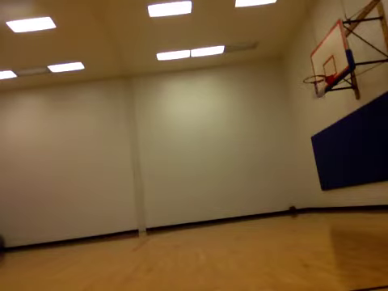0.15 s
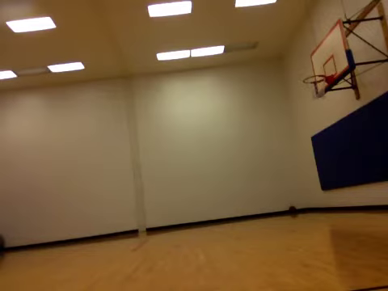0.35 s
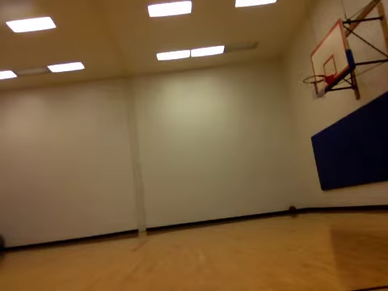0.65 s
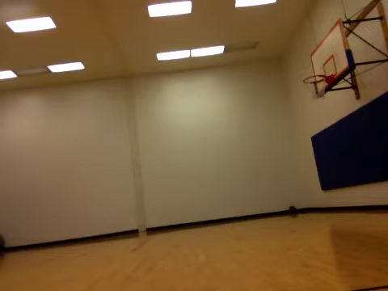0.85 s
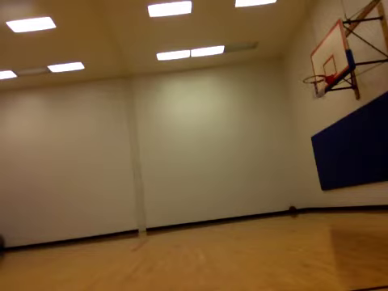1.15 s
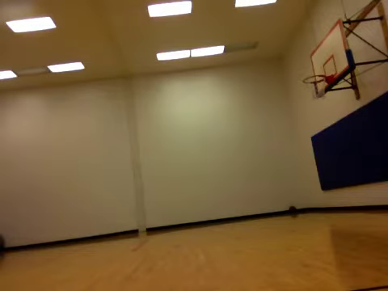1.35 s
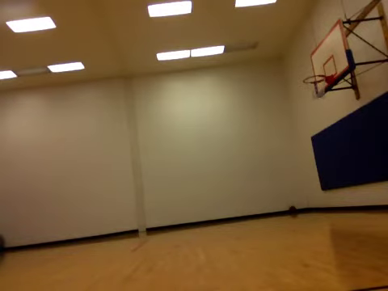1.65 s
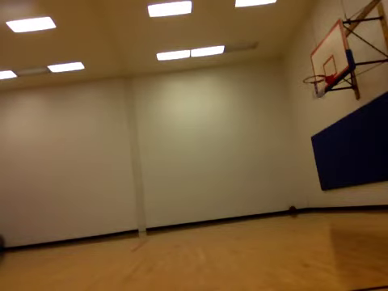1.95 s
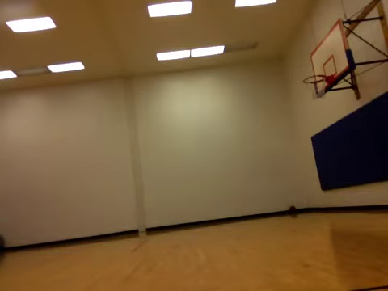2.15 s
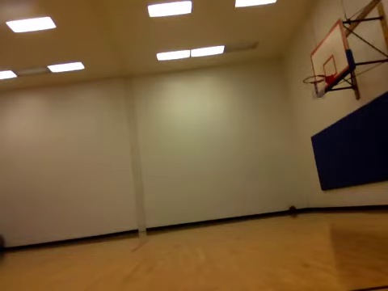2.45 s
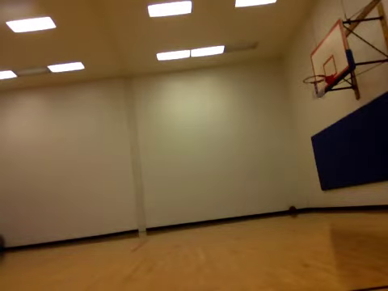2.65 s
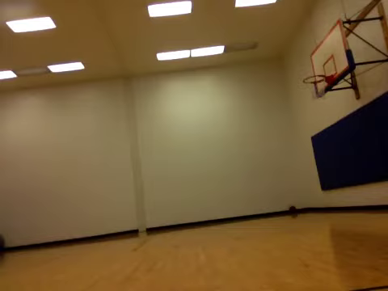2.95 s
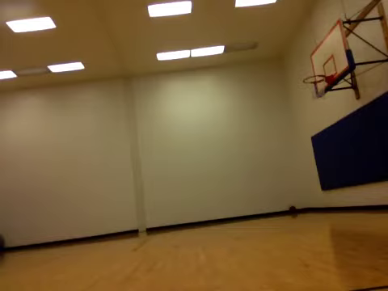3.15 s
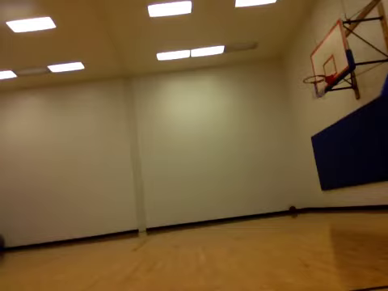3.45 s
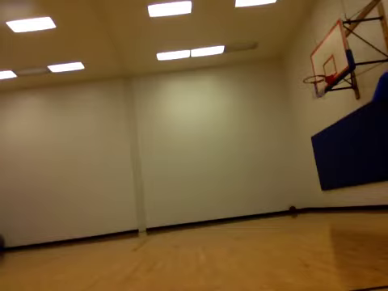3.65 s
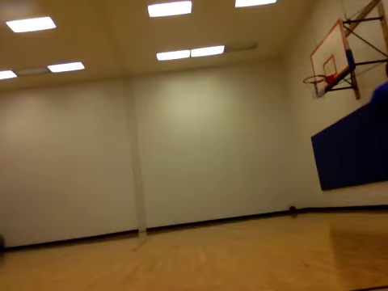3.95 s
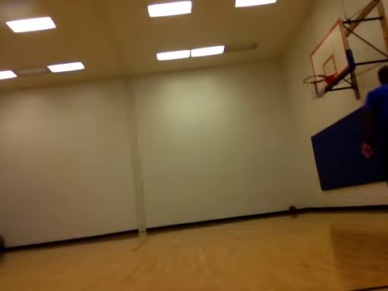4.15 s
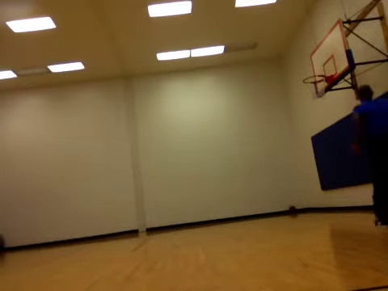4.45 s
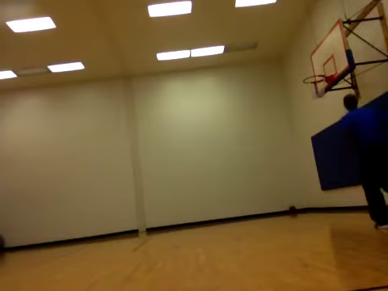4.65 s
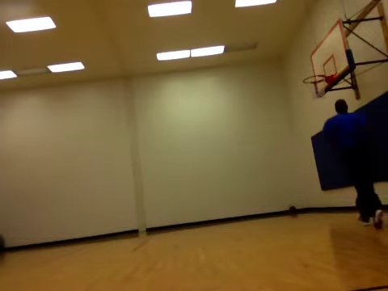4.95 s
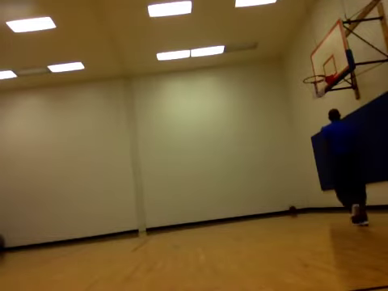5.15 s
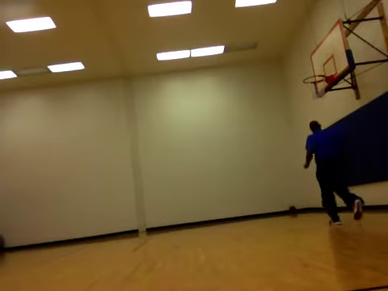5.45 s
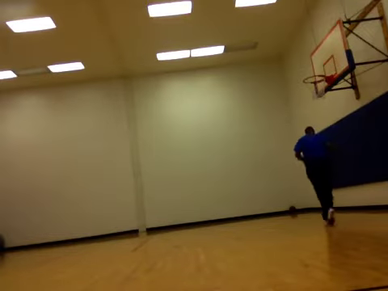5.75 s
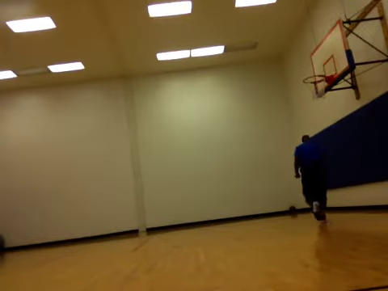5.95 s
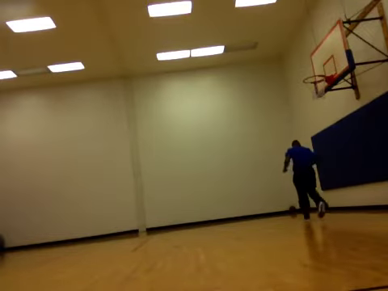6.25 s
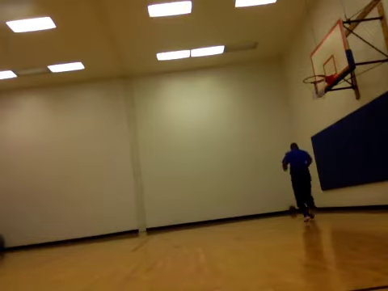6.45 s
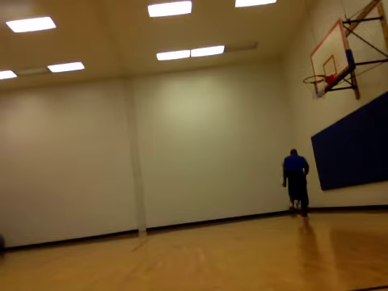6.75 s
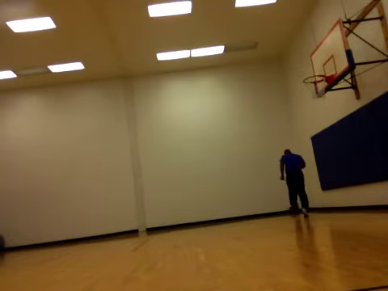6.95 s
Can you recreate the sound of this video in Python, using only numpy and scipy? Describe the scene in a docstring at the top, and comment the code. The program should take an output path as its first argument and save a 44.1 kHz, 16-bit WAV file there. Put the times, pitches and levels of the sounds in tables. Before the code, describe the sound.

Quiet knocks on wood near the microphone open over steady fan noise. A basketball slams on hardwood, hard and sharp, with wall slaps and a long bright hall tail. The bounces continue, spaced wide at first, then quickening and dulling into a low patter that dies out. Afterwards, soft reverberant jogging steps with brief rubbery scuffs and cloth rustle recede under the lingering echo of the bare gymnasium.

```python
"""A basketball bangs on the sprung wooden floor of a large empty gym, then is left to bounce itself out.
Each bounce is an impulse that excites damped modes of boards and ball, and dispersive waves in the floor.
Discrete echoes and a diffuse noise tail, shaped band by band, make the hall ring for seconds.
Woody knocks sound close by; a player jogs away with scuffing shoes and rustling clothes (filtered noise).
Beneath lies the steady rumble and hiss of the ventilation, with a faint fan tone."""
import sys
import numpy as np
from scipy import signal
from scipy.fft import rfft, irfft
from scipy.io import wavfile
from scipy.ndimage import uniform_filter1d

SR = 44100
rng = np.random.default_rng(int(sys.argv[2]) if len(sys.argv) > 2 else 0)


def persist_wave(psi):
    """Save psi, clipped to +-1, as 16-bit WAV."""
    counts = np.round(np.clip(psi, -1, 1) * 32767).astype(np.int16)
    wavfile.write(sys.argv[1], SR, np.atleast_2d(counts).T)


N = 312801

# bounces of the ball: (t/s, boom level/dB, boom f/Hz, slap level/dB, slap tilt/dB per octave,
# bite level/dB, bite f/Hz)
BOUNCES = [(1.5602, -8, 146.6, -4, 0.4, 1.5, 1800), (2.2524, -9, 161.5, 1, 2.5, -1.5, 1800),
           (3.5816, -13.5, 153.3, -6, 1.4, 4, 3200), (4.2370, -13, 165, -12, 0.9, 0, 3200),
           (4.7424, -9.5, 147.7, -11, 1.5, 1, 1800), (5.1254, -17, 144.3, -18, -1, 4, 3200),
           (5.4145, -17.5, 171.5, -38.5, -6.5, 8, 1800), (5.639, -17, 164.5, -33.5, -5, 9, 1800)]
# spectrum of the slap: (f/Hz, level/dB)
SLAP_SPECTRUM = [(40, -23), (150, -12.5), (400, 6), (650, 2.5), (1100, 1), (1750, 2), (2700, -1.5),
                 (4000, -4), (5700, -6), (7800, -12.5), (10000, -17), (12000, -27.5), (15500, -52.5)]


def ball(shape, hall_db=0):
    """Impact excitation: each bounce rings the ball and the boards and sends waves through the floor."""
    out = np.zeros(N)
    for s, boom_db, boom_hz, slap_db, tilt_db, bite_db, bite_hz in BOUNCES + settling():
        thud = boom(boom_db, boom_hz)
        crack = slap(slap_db, SLAP_SPECTRUM, tilt_db, 0.93, bite_db, bite_hz)
        add(out, s, in_gym(thud, crack, shape, hall_db))
        add(out, s, amp(boom_db) * bending_waves(slap_db, size=8192))
    return out


# each last flight is this share of the one before, and each last bounce this much softer
RESTITUTION, SETTLE_DB = 0.765, -8.5


def settling(count=4):
    """Inelastic rebound: the last small bounces come ever quicker and softer, in geometric progression."""
    s, boom_db, boom_hz, slap_db, *colour = BOUNCES[-1]
    flight = s - BOUNCES[-2][0]
    rows = []
    for k in range(1, count + 1):
        s += flight * RESTITUTION ** k
        softer_db = k * SETTLE_DB
        rows.append((s, boom_db + softer_db, boom_hz, slap_db + softer_db, *colour))
    return rows


# modes of the floor boards: (multiple of the boom f, level/dB, t60/s)
BOARD_MODES = [(.7, -31, 0.039), (1, 3.5, 0.047), (1.3, -0.5, 0.039), (1.88, -12.5, 0.07),
               (2.8, -20.5, 0.062), (3.7, -23, 0.11)]


def boom(db, hz, push_s=0.003):
    """Damped modal vibration: the boards are pushed down and swing back."""
    t = np.arange(SR // 4) / SR
    onset = 1 - np.exp(-t / push_s)
    return -amp(db) * ring(BOARD_MODES, t, hz) * onset


# modes of the air inside the ball: (f/Hz, level/dB, t60/s)
BALL_MODES = [(928, -44.5, 0.11), (1496, -42, 0.2), (1815, -28.5, 0.01), (1930, -44, 0.19),
              (2115, -41, 0.071), (2580, -56, 0.043)]


def slap(db, points, tilt_db, cavity, bite_db=0, bite_hz=1800):
    """Cavity resonance: the contact is one spike, with more or less bite; the air in a ball pings after it."""
    out = cavity * ring(BALL_MODES, np.arange(SR // 4) / SR)
    add(out, 0, click(points, tilt_db))
    bite = signal.lfilter(*signal.iirpeak(bite_hz, 1, fs=SR), out)
    return amp(db) * (out + (amp(bite_db) - 1) * bite)


# paths of bending waves through the floor: (travel t/s at BEND_HZ, level/dB)
BEND_PATHS = [(0.0124, 0.31), (0.023, -1)]
# spectrum of the bending waves: (f/Hz, level/dB)
BEND_SPECTRUM = [(80, -30), (150, 0), (300, 4), (550, -1.5), (1000, -3.5), (1800, -21), (4000, -64)]
BEND_HZ = 705
BEND_TILT_DB, BEND_SOFTEN = 0.5, 0.061  # tilt (dB per octave), and its change per dB of slap


def bending_waves(slap_db, size, level_db=17, spread=0.133):
    """Dispersion: boards carry high notes faster, so each path is a falling sweep, duller if the slap is soft."""
    hz = np.fft.rfftfreq(size, 1 / SR)
    paths = 0
    for s, db in BEND_PATHS:
        travel_s = s * (1 + spread * rng.uniform(-0.956, 1))
        # this phase gives a delay proportional to 1 / sqrt(frequency)
        paths = paths + amp(db) * np.exp(-4j * np.pi * travel_s * np.sqrt(BEND_HZ * hz))
    tilt_db = (BEND_TILT_DB + BEND_SOFTEN * slap_db) * np.log2(np.maximum(hz / 300, 1))
    return amp(level_db) * irfft(paths * amp(read(BEND_SPECTRUM, hz) + tilt_db), size)


def floor_waves(thud, level_db=-25, last_s=0.032):
    """Multipath propagation: waves in the sprung floor keep the boom up for a few hundredths of a second."""
    size = int(last_s * SR)
    path = amp(level_db) * rng.standard_normal(size) * np.linspace(0, 1, size)
    return thud + signal.fftconvolve(thud, path)[:len(thud)]


# knocks close by: (t/s, boom level/dB, tap level/dB)
KNOCKS = [(0.094, -29, -35.5), (0.1204, -30, -27), (.203, -37, -40), (0.2189, -37, -37), (.372, -37.5, -46),
          (1.025, -39.5, -45), (1.29, -39, -70), (3.4214, -45, -37)]
# woody note of a knock: (f/Hz, level/dB, t60/s)
WOOD_MODES = [(980, -11, 0.021), (1134, -10.5, 0.028), (1290, -12.5, 0.023)]
KNOCK_HZ, KNOCK_TILT_DB, KNOCK_HALL_DB = 185, -2, -4.5  # boom pitch, tilt per octave, hall level


def knocks(shape):
    """Near-field impacts: a blunt tap and a woody modal note, fairly dry."""
    out = np.zeros(N)
    note = ring(WOOD_MODES, np.arange(SR // 4) / SR)
    for s, boom_db, tap_db in KNOCKS:
        clack = tap(tap_db, KNOCK_TILT_DB, spread_s=0.0058) + amp(tap_db) * note
        add(out, s, in_gym(boom(boom_db, KNOCK_HZ), clack, shape, KNOCK_HALL_DB, echo_db=1))
    return out


# spectrum of a blunt tap: (f/Hz, level/dB)
TAP_SPECTRUM = [(60, -48), (200, -20), (400, -1.5), (560, -2.5), (800, -1), (1150, 3), (1650, 0),
                (2100, -3), (3000, -3), (4200, -7), (6000, -11.5), (10000, -36), (15500, -28)]


def tap(db, tilt_db, spread_s):
    """Distributed contact: a blunt touch with no ping, spread over a few thousandths of a second."""
    return scattered(slap(db, TAP_SPECTRUM, tilt_db, 0), share=0.93, life_s=spread_s)


# footfalls of the player: (t/s, boom level/dB, scuff level/dB)
FOOTFALLS = [(3.365, -45.5, -75), (5.532, -30, -45), (5.979, -34, -51), (6.364, -37.5, -44),
             (6.806, -44, -47.5)]
STEP_HZ, STEP_TILT_DB, STEP_HALL_DB = 149, -8, 1.5  # boom pitch, tilt per octave, hall level
HEEL_DB = -5  # the heel's tap, relative to the boom


def footfalls(shape):
    """Reverberant impacts: the heel taps and the boards boom, mostly by way of the hall."""
    out = np.zeros(N)
    for s, boom_db, _ in FOOTFALLS:
        heel = tap(boom_db + HEEL_DB, STEP_TILT_DB, spread_s=0.014)
        add(out, s, in_gym(boom(boom_db, STEP_HZ), heel, shape, STEP_HALL_DB))
    return out


# spectrum of the sliding soles: (f/Hz, level/dB)
SCUFF_SPECTRUM = [(200, -38), (600, 0.5), (1500, 4.5), (2400, -1.5), (3500, -2), (6000, -5), (14000, -27)]
# the sole slides as it lands: lead before the footfall, length, tilt per octave
SCUFF_LEAD_S, SCUFF_S, SCUFF_TILT_DB = 0.012, 0.11, -0.5


def scuffs(slip_db=2.0):
    """Stick-slip friction: rubber sticks and slips many times in one slide on the varnish."""
    out = np.zeros(N)
    size = int(SCUFF_S * SR)
    for s, _, db in FOOTFALLS:
        slips = amp(slip_db * evened(uniform_filter1d(rng.standard_normal(size), size=150)))
        slide = evened(noise(SCUFF_SPECTRUM, size, SCUFF_TILT_DB) * slips)
        add(out, s - SCUFF_LEAD_S, amp(db) * slide * np.sqrt(np.hanning(size)))
    return out


# rustles of the moving player's clothes: (t/s, length/s, level/dB)
RUSTLES = [(0.836, 0.67, -49.5), (3.9, 3.9, -52.5), (6.3, 1.3, -55)]
# spectrum of the cloth: (f/Hz, level/dB)
CLOTH_SPECTRUM = [(150, -20), (300, 0.5), (550, 8), (1000, -1), (2200, -6.5), (4500, -12), (8000, -20),
                  (15000, -34)]
RUSTLE_RISE_S, RUSTLE_FADE_DB = 0.093, -10.5  # rise and release time; fade over one rustle


def rustles():
    """Friction noise: cloth rubs as the player moves, each rustle fading along its length."""
    out = np.zeros(N)
    for s, length, db in RUSTLES:
        t = np.arange(int(length * SR)) / SR
        edges = np.minimum(np.minimum(t, length - t) / RUSTLE_RISE_S, 1)
        swell = edges * amp(db + RUSTLE_FADE_DB * t / length)
        add(out, s, swell * noise(CLOTH_SPECTRUM, N)[:len(t)])
    return out


def player(shape, flutter_db=2, direct_db=-4, hall_db=-1):
    """Amplitude modulation: soles and clothes rub in uneven little spurts, heard mostly by way of the hall."""
    flutter = evened(uniform_filter1d(rng.standard_normal(N), size=600))
    rub = (rustles() + scuffs()) * amp(flutter_db * flutter - 2.5)
    return amp(direct_db) * rub + amp(hall_db) * signal.fftconvolve(rub, hall_tail(shape))[:N]


# reflections off the walls and ceiling: (delay t/s, level/dB)
ECHOES = [(0.024, -12), (0.03, -15.5), (0.0545, -12.5), (0.059, -23), (0.0694, -16), (0.0722, -33)]


def in_gym(thud, crack, shape, hall_db, wall_s=0.013, echo_db=0, wall_db=-10, bass_echo_db=0,
           crack_hall_db=4):
    """Superposition of sound paths: direct sound, nearest wall, single echoes and diffuse tail."""
    out = amp(hall_db) * signal.fftconvolve(thud + amp(crack_hall_db) * crack, hall_tail(shape))
    direct = scattered(scattered(crack, share=0.75, life_s=0.00087), share=0.35, life_s=0.02)
    add(out, 0, floor_waves(thud) + direct)
    # thud and crack are mirrored at their own levels, the crack scattered
    mirrored = amp(bass_echo_db) * thud + amp(echo_db) * scattered(crack, share=0.3, life_s=0.00063)
    for delay, db in [(wall_s, wall_db)] + ECHOES:
        add(out, delay, amp(db) * mirrored)
    return out


def scattered(sound, share, life_s):
    """Scattering: a spike is followed by a short spray of reflections off things nearby."""
    t = np.arange(SR // 16) / SR
    spray = rng.standard_normal(len(t)) * np.exp(-t / life_s) * (t > 0.0003)
    return sound + share * signal.fftconvolve(sound, spray / np.linalg.norm(spray))[:len(sound)]


# decay of the hall: (f/Hz, t60/s)
HALL_T60 = [(80, 1.7), (160, 1.69), (300, 1.09), (600, 4.5), (1600, 4), (3000, 3.5), (5000, 2),
            (8000, 1.11), (11000, 0.58), (15000, .5)]
# spectrum of the hall's tail: (f/Hz, level/dB)
HALL_GAIN = [(70, -11), (150, 2.5), (250, 10), (500, -1), (1000, -3), (2000, 0), (3500, -0.5), (6000, -2),
             (10000, 3.5), (13000, 13), (15500, 15)]


def hall_shape(swell_s=0.071, swell_width_s=0.0087, early=0.24):
    """Reverberant decay by band and time: thin at first, dense once the far walls answer."""
    hz = np.fft.rfftfreq(512, 1 / SR)[:, None]
    t = np.arange(900) * 128 / SR
    swell = early + (1 - early) / (1 + np.exp((swell_s - t) / swell_width_s))
    onset = 1 - np.exp(-t / 0.018)
    return swell * onset * amp(read(HALL_GAIN, hz) - 60 * t / read(HALL_T60, hz))


def hall_tail(shape, grain_db=2.0, grain_s=0.46):
    """Diffuse field: a fresh random tail, grainy while its reflections are still few."""
    real, imaginary = rng.standard_normal((2,) + shape.shape, dtype=np.float32)
    t = np.arange(shape.shape[1]) * 128 / SR
    grain = amp(grain_db * np.exp(-t / grain_s) * rng.standard_normal(len(t)))
    spectrogram = (real + 1j * imaginary) * (shape * grain)
    return signal.istft(spectrogram, nperseg=512, noverlap=384)[1] * amp(-59.5)


# spectrum of the ventilation: (f/Hz, level/dB)
AIR_SPECTRUM = [(15, -72), (25, -42), (53, -12), (86, -7.5), (136, -0.5), (221, -3), (274, -1.5),
                (340, -9.5), (433, -14.5), (1140, -27), (1380, -28), (1530, -27.5), (6050, -37),
                (10100, -38.5), (15500, -40.5)]
AIR_DB = -49.5


def ventilation(hum_hz=196.0, hum_db=-59):
    """Stationary broadband noise: steady rumble and hiss, with a faint fan tone."""
    hum = np.sin(2 * np.pi * hum_hz * np.arange(N) / SR)
    return amp(AIR_DB) * noise(AIR_SPECTRUM, N) + amp(hum_db) * hum


def amp(db):
    """Level definition: dB to amplitude ratio."""
    return 10 ** (np.asarray(db) / 20)


def evened(x):
    """Normalisation: scales to an rms of 1."""
    return x / np.sqrt(np.mean(x ** 2) + 1e-20)


def smoothed(x, lag_s):
    """First-order relaxation: follows x with a lag."""
    keep = np.exp(-1 / (lag_s * SR))
    return signal.lfilter([1 - keep], [1, -keep], x)


def read(points, hz):
    """Linear interpolation of a table on a log-frequency axis."""
    f, value = np.transpose(points)
    return np.interp(np.log(hz + 1), np.log(f + 1), value)


def add(mix, s, sound):
    """Superposition: mixes a sound in at time s."""
    part = mix[max(round(s * SR), 0):][:len(sound)]
    part += sound[:len(part)]


def tilted(points, hz, tilt_db):
    """Spectral tilt: a spectrum as gains, tilted around 2 kHz in dB per octave."""
    return amp(read(points, hz) + tilt_db * np.log2(np.clip(hz, 450, 10000) / 2000))


def noise(points, size, tilt_db=0):
    """Filtered white noise: rms 1, with the given spectrum."""
    gains = tilted(points, np.fft.rfftfreq(size, 1 / SR), tilt_db)
    return evened(irfft(rfft(rng.standard_normal(size)) * gains, size))


def click(points, tilt_db, size=1024):
    """Minimum phase: a causal pulse of height 1 with the given spectrum."""
    log_gain = np.log(tilted(points, abs(np.fft.fftfreq(size, 1 / SR)), tilt_db))
    # the Hilbert transform of the log gain supplies the phase
    pulse = np.fft.ifft(np.exp(np.conj(signal.hilbert(log_gain)))).real[:size // 2]
    return pulse / abs(pulse).max()


def ring(modes, t, pitch=1):
    """Modal superposition: struck modes die away exponentially."""
    return sum(amp(db - 60 * t / t60) * np.sin(2 * np.pi * f * pitch * t) for f, db, t60 in modes)


def scene():
    """Linear superposition: everything in one hall, at one microphone."""
    shape = hall_shape()
    return (ball(shape) + knocks(shape) + footfalls(shape) + player(shape) + ventilation())[None]


def record(dry, threshold_db=-24, squeeze=0.23, recover_db_per_s=4, sense_s=0.024, glide_s=0.0015,
           low_cut_hz=85, edge_hz=15500):
    """Dynamic compression: gain ducks after each bang, peaks round off, deep bass and top treble are cut."""
    x = dry[0]
    power_db = 10 * np.log10(smoothed(x ** 2, sense_s) + 1e-12)
    # the held peak level falls back at a steady rate
    fall = np.arange(N) / SR * recover_db_per_s
    held_db = np.maximum.accumulate(power_db + fall) - fall
    over_db = np.maximum(held_db - threshold_db, 0)
    x = x * amp(-squeeze * smoothed(over_db, glide_s))  # the gain comes down too late for the first crack
    rounded = np.tanh(x)
    x = signal.sosfilt(signal.butter(4, low_cut_hz, "high", fs=SR, output="sos"), rounded)
    band_limit = signal.firwin(511, edge_hz, window=("kaiser", 9), fs=SR)
    return signal.oaconvolve(x, band_limit, "same")[None]


dry = scene()
out = record(dry)
persist_wave(out)
```